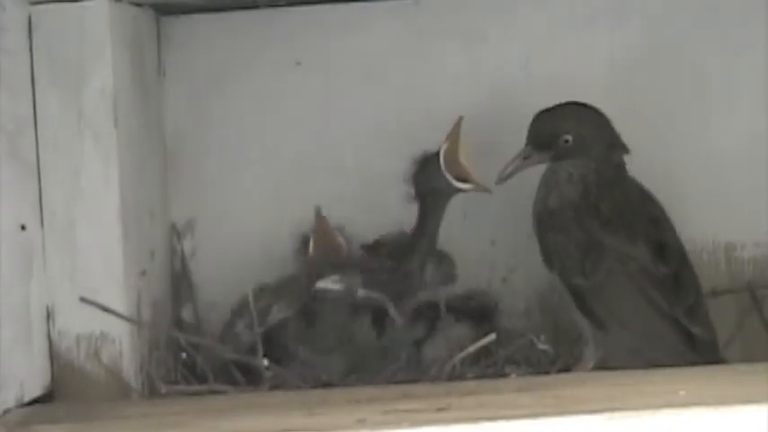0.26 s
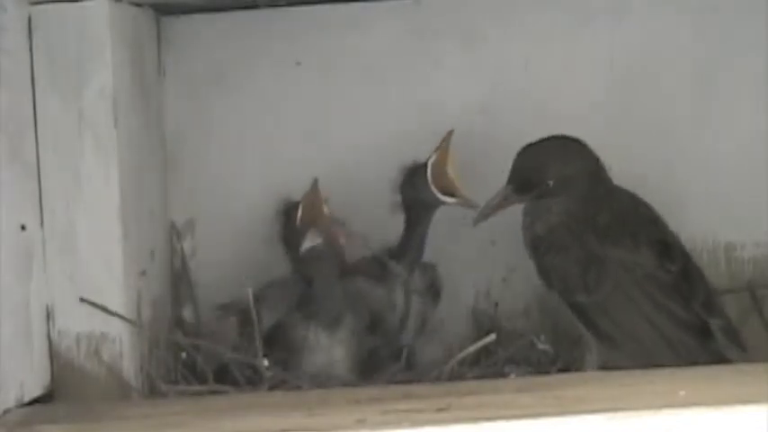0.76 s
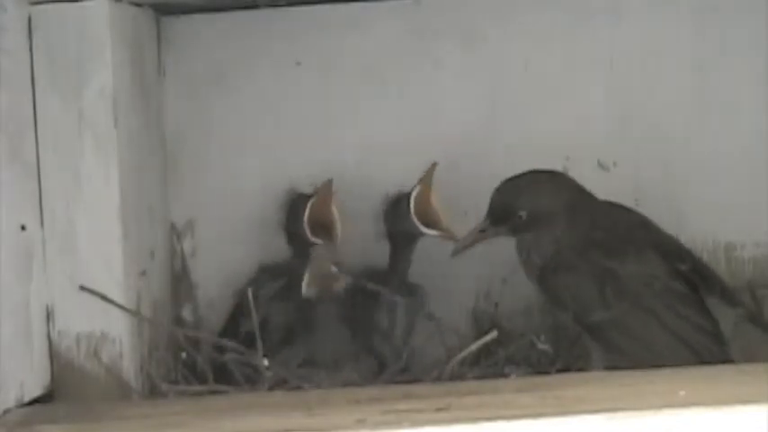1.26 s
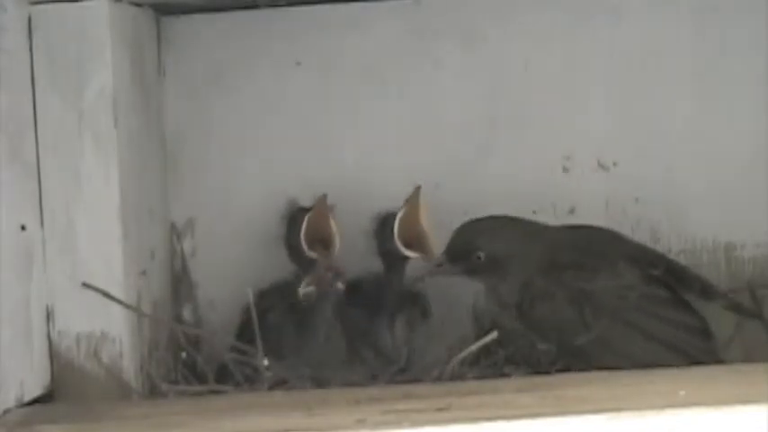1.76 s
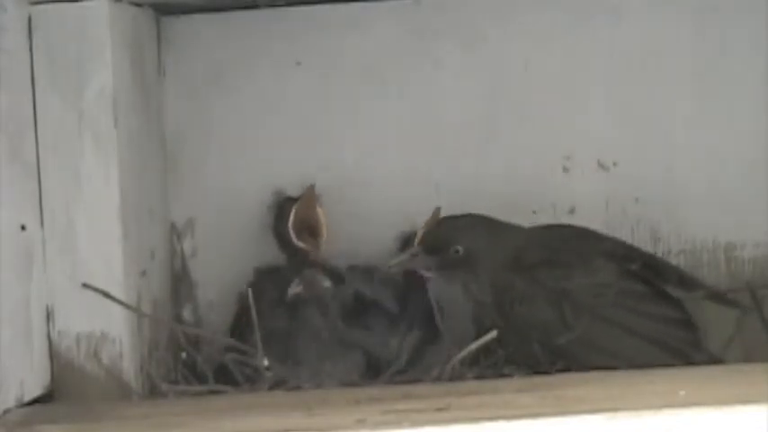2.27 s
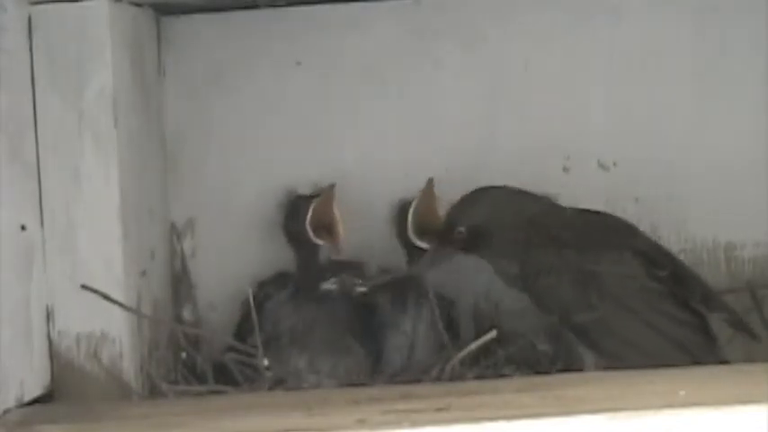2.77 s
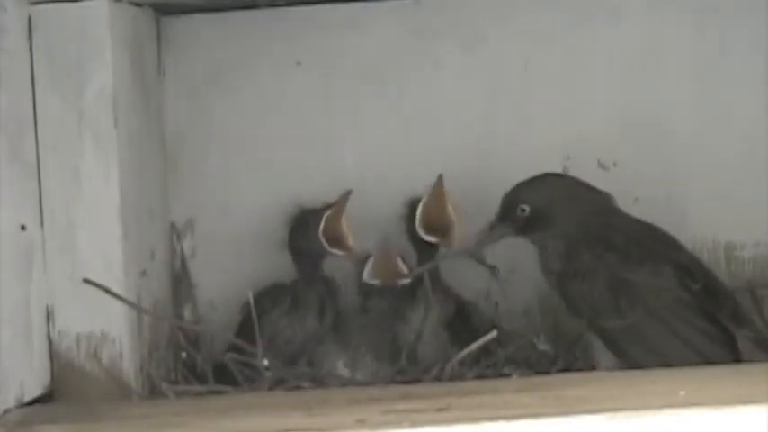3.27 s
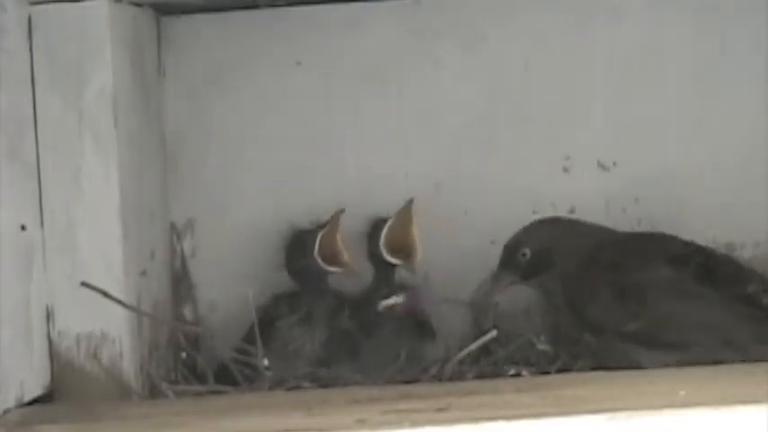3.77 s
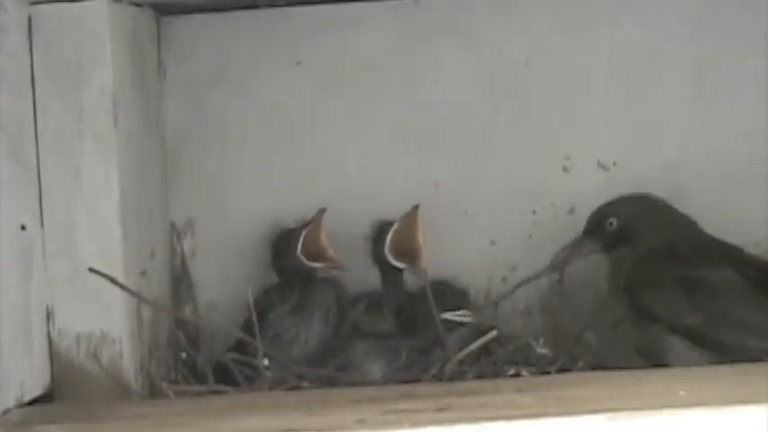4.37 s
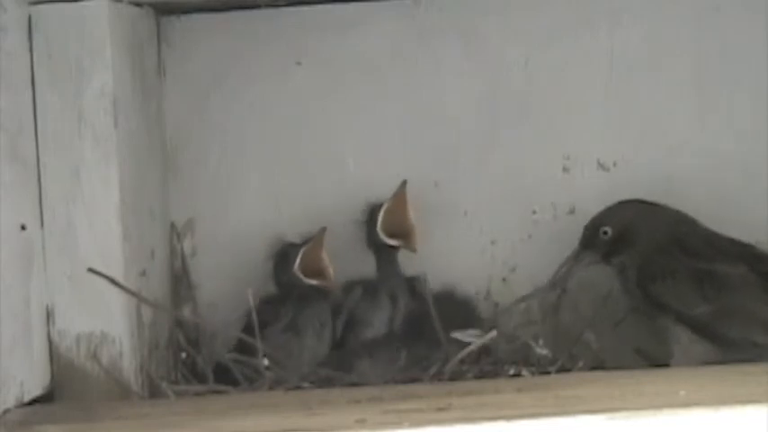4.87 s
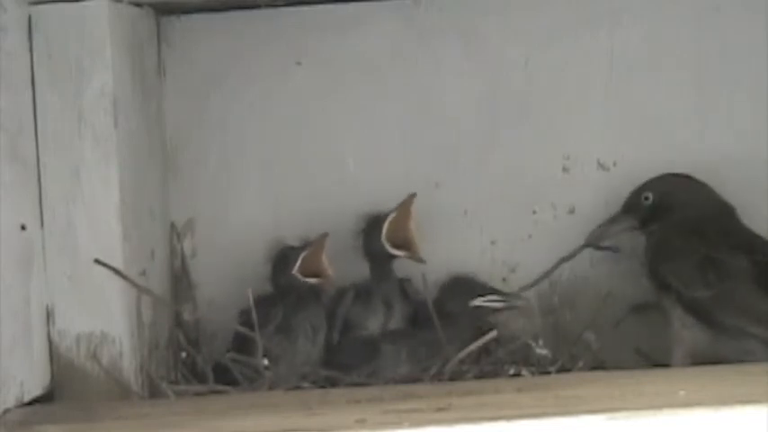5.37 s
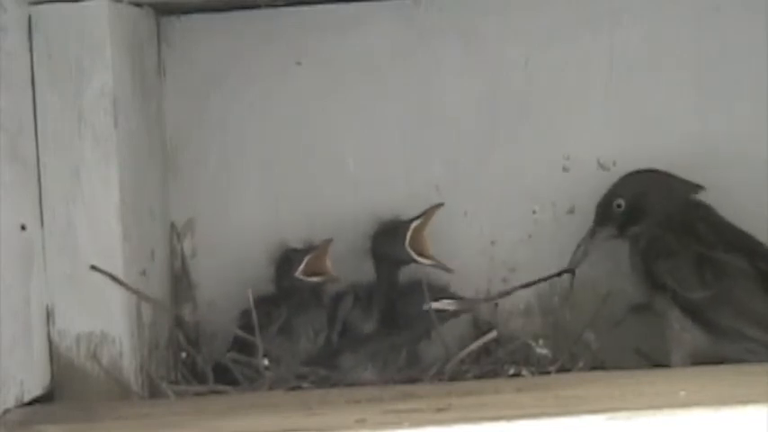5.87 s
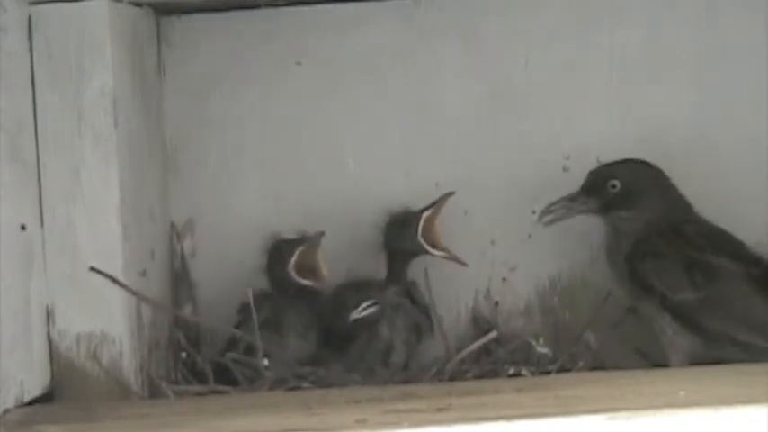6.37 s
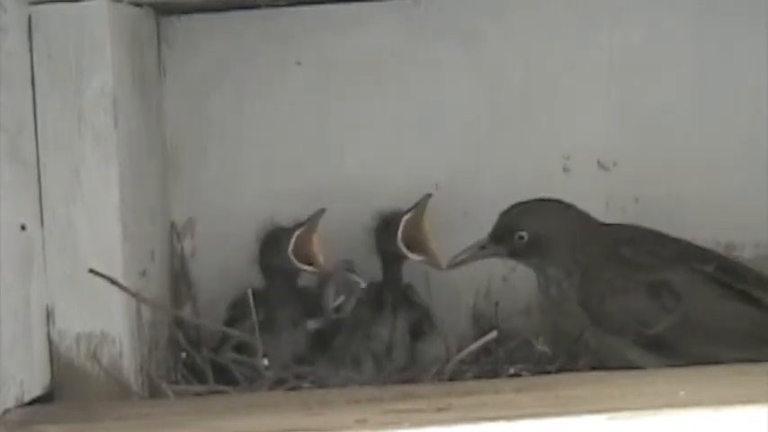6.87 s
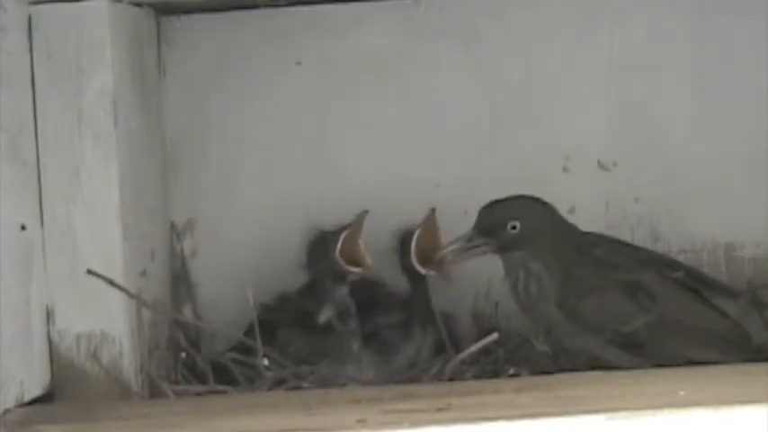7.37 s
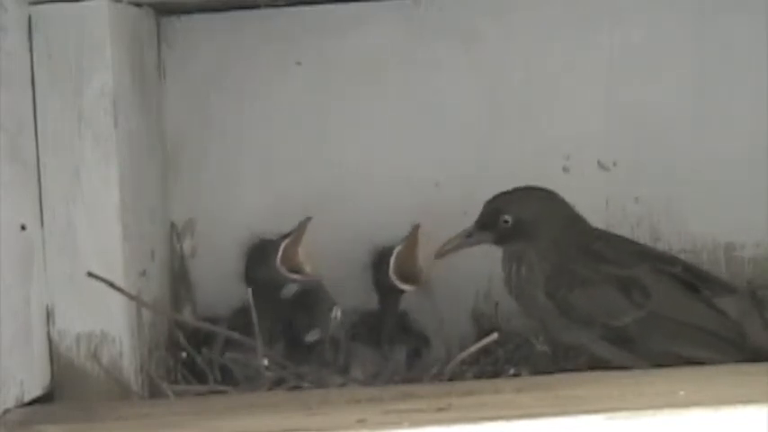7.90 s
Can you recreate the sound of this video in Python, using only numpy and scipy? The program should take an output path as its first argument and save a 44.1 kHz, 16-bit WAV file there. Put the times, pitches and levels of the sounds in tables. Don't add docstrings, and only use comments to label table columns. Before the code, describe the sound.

Several nestling birds beg almost without pause in a small nest box, rapid high trilled peeps overlapping hoarse, squealing rasps, over faint outdoor rumble.

```python
import sys
import numpy as np
from scipy import signal
from scipy.fft import rfft, irfft, next_fast_len
from scipy.io import wavfile
from scipy.ndimage import uniform_filter1d, minimum_filter1d, map_coordinates

SR = 44100
rng = np.random.default_rng(int(sys.argv[2]) if len(sys.argv) > 2 else 0)


def file_out(sig):
    cols = np.atleast_2d(sig).T
    lim = np.clip(cols, -1, 1)
    pcm = np.round(lim * 32767).astype(np.int16)
    wavfile.write(sys.argv[1], SR, pcm)


def gain_from_decibels(decibels):
    exponent = np.asarray(decibels, float) / 20
    return 10 ** exponent


N = 358974


def peeps():
    # start_s, length_s, pitch_hz, level_db
    stray_peeps = [(0.053, .022, 7650, -21.5), (0.107, 0.041, 7645, -22.5), (0.177, 0.015, 6180, -18.5),
                   (.563, 0.037, 7650, -24), (0.854, .038, 7450, -17.5), (1.294, .063, 7770, -25.5),
                   (1.461, .022, 7460, -28.5), (2.177, .02, 5920, -19.5), (2.588, .028, 7610, -20),
                   (3.364, .02, 6225, -24.5), (3.682, .018, 6160, -21), (4.018, 0.022, 5915, -17.5),
                   (4.17, 0.041, 7660, -22), (4.599, .026, 7600, -20.5), (4.633, .016, 6950, -20),
                   (4.657, 0.019, 6110, -17.5), (5.008, .016, 6720, -21), (5.03, 0.019, 6136, -18.5),
                   (5.398, .036, 7380, -23), (5.781, 0.028, 7245, -23.5), (6.077, .016, 7020, -20.5),
                   (6.14, .03, 7815, -24), (6.21, .041, 7780, -19.5), (6.327, .024, 6800, -19.5),
                   (6.392, 0.026, 6940, -23.5), (6.523, .026, 7105, -24), (6.975, 0.011, 6130, -19.5),
                   (7.074, .032, 7135, -21.5), (7.936, .018, 6190, -24), (8.004, .042, 7100, -19)]
    notes = trill_notes()
    notes += [(s, length, hz, -250, db) for s, length, hz, db in stray_peeps]
    track = np.zeros(N + SR)
    for s, length, mid_hz, glide_hz, db in notes:
        size = round((length + 0.016) * SR)
        hook = 800 * np.exp(-np.arange(size) / (0.00323 * SR))
        sag = 100 - 300 * np.linspace(-1, 1, size) ** 2
        hz = mid_hz + glide_hz * np.linspace(-.5, .5, size) + hook + sag
        octave_db = -33.5 - .008 * max(mid_hz - 6700, 0)
        tone = whistle(hz, 80, 3.2, 0.26, 241.3, octave_db=octave_db)
        add(track, s - .001, gain_from_decibels(db + 0.5) * puff(size, 0.35, 1.4) * tone)
    voice = track[:N]
    air = unit(filtered(rng.standard_normal(N), lambda hz: np.exp(-((hz - 10820) / 1100) ** 2)))
    loudness = uniform_filter1d(abs(voice), size=1500)
    return voice + gain_from_decibels(-33.5 + 5 * wobble(25, N)) * air * loudness


def trill_notes():
    # first_note_s, last_note_s, crest_hz, last_note_hz, level_db
    trills = [(0.506, 0.741, 6930, 5945, -19.5), (.923, 1.276, 6933, 6330, -15.5),
              (1.484, 1.84, 7130, 6535, -18.5), (2.078, 2.454, 7233, 6310, -16.5),
              (2.653, 2.938, 7230, 6265, -15.5), (3.143, 3.43, 7520, 6060, -19),
              (3.638, 3.996, 7500, 6335, -17.5), (4.208, 4.493, 7600, 5820, -15.5),
              (4.693, 4.913, 7530, 6665, -16), (5.201, 5.423, 7250, 6525, -15.5),
              (5.703, 5.986, 6910, 6610, -14.5), (6.108, 6.369, 6940, 6760, -19),
              (6.563, 6.85, 7200, 6970, -17.5), (7.067, 7.283, 7440, 6710, -18.5),
              (7.516, 7.814, 7420, 6025, -19), (8.0, 8.074, 7485, 7490, -18.5)]
    # start_s, change_db
    accents = [(.507, 8), (.744, -7), (1.134, 1.5), (1.201, -3), (1.277, -1), (1.766, 4), (1.84, 2),
               (2.794, 3), (3.144, 4), (3.21, 2), (3.279, -4), (3.358, 0), (3.698, -5.5), (4.838, 1.5),
               (4.915, 1), (5.202, 2), (5.761, -4.5), (6.226, 3), (6.294, 5), (6.775, -2), (6.848, 3.5),
               (7.146, -1.5), (7.284, 7), (7.513, -1.5), (8.074, 2.5)]
    pace_s, hurry_s = .073, .009
    accent_s, accent_db = np.transpose(accents)
    rows = []
    for first, last, crest_hz, last_hz, db in trills:
        count = round((last - first) / pace_s)
        second = last - (last - first + hurry_s) * (count - 1) / count
        s = np.append(first, np.linspace(second, last, count))
        droop = (crest_hz - last_hz) * np.linspace(0, 1, count) ** 2.5
        opener_hz = 6514 + .45 * (crest_hz - 7200)
        hz = np.append(opener_hz, crest_hz - droop)
        level = db + (abs(s[:, None] - accent_s) < pace_s / 3) @ accent_db
        usual_s = np.append(.021, np.full(count, 0.0311))
        length = np.clip(usual_s - 0.07 * (level + 16.5), .01, .06)
        glide_hz = min(1.12 * (7500 - crest_hz), 424)
        rows += zip(s, length, hz, np.full(count + 1, glide_hz), level)
    return rows


def squeals():
    # start_s, length_s, pitch_hz, level_db
    arches = [(0.174, .037, 7890, -13), (.236, .046, 8380, -15), (0.286, 0.031, 8175, -21.5),
              (0.334, .04, 8450, -16), (0.414, 0.028, 7600, -11.5), (0.625, .045, 7910, -16.5),
              (0.688, 0.04, 8610, -17), (0.781, .027, 8550, -16.5), (1.515, .021, 8065, -18),
              (1.927, .038, 8230, -21.5), (2.008, 0.044, 8820, -21), (2.1, .042, 8670, -25.5),
              (2.369, 0.02, 8160, -17.5), (2.429, 0.031, 8810, -22), (2.776, .032, 8350, -24.5),
              (2.853, .04, 9000, -26), (2.944, .028, 8690, -19.5), (3.273, 0.052, 8800, -24),
              (3.369, .045, 8420, -20.5), (4.085, .046, 8780, -17.5), (4.182, .016, 8020, -23),
              (5.342, 0.039, 8000, -28), (5.807, .016, 7760, -19.5), (6.583, .056, 8900, -21),
              (6.982, .051, 8700, -18.5), (7.066, 0.058, 8200, -23.5), (7.385, .037, 8720, -17),
              (7.474, .032, 8310, -16), (7.782, .046, 8700, -18), (7.864, .057, 8270, -18)]
    # start_s, level_db
    breaks = [
        (2.441, -21),
        (3.705, -22),
        (4.099, -24),
        (4.503, -23.5),
        (5.727, -33),
        (6.139, -24.5),
        (7.398, -25),
        (7.789, -36),
    ]
    track = np.zeros(N + SR)
    rasp_s, _, air_db = np.transpose(rasp_rows())
    notes = [(s, length, hz, 351, db) for s, length, hz, db in arches]
    notes += [(s, .03, 9590, -120, db) for s, db in breaks]
    for s, length, hz, climb_hz, db in notes:
        strain_db = np.clip(np.interp(s, rasp_s, air_db) - db + 3, -14, 3)
        squeal = arch(hz - climb_hz / 2, hz + climb_hz / 2, length + 0.02, 0.1, strain_db)
        add(track, s - .01, gain_from_decibels(db - 2.0) * squeal)
    return track[:N]


def rasps():
    # share_of_rasp, pitch_hz
    rasp_rise = [(0, 6095), (0.33, 5591), (0.62, 6147), (1, 7580)]
    # frequency_hz, level_db
    breath = [(4000, -19.5), (5200, -10), (6300, 0.5), (9000, -12.5), (11500, -8), (13000, -25.5),
              (15500, -41.5)]
    track, effort = np.zeros(N + SR), np.zeros(N + SR)
    size, short = round(.045 * SR), round(0.029 * SR)
    share, rise_hz = np.transpose(rasp_rise)
    hz = np.interp(np.linspace(0, 1, size), share, rise_hz)
    for s, db, air_db in rasp_rows():
        rasp = whistle(hz, 200, 4.5, .45, 350, octave_db=-27)
        add(track, s - .012, gain_from_decibels(db - 5) * puff(size, .5, 1) * rasp)
        grunt = whistle(hz[:short] / 2, 59, 7.6, 0.54, 205)
        grunt = grunt + gain_from_decibels(-5.5) * whistle(hz[:short] * .77, 150, 1.9, 0.24, 300)
        add(track, s - .006, gain_from_decibels(-42.0 + 0.1 * (db + 15.0)) * puff(short, 0.55, 3.7) * grunt)
        add(track, s - .06, gain_from_decibels(air_db - 4) * arch(*rng.normal((7900, 8400), 150), .058, hoarse=.1))
        add(track, s + .02, gain_from_decibels(air_db - 2) * arch(*rng.normal((8400, 8600), 150), .065, hoarse=.1))
        add(effort, s - .065, gain_from_decibels(air_db - 13.5) * puff(round(.15 * SR), .45, 1.3))
    hiss = unit(filtered(rng.standard_normal(N), lambda hz: gain_from_decibels(along(breath, hz))))
    return track[:N] + effort[:N] * hiss * gain_from_decibels(4 * wobble(60, N))


def rasp_rows():
    # first_s, last_s, first_db, last_db, last_air_db
    bouts = [(.0044, .0817, -14, -19, -51.5), (.216, .3885, -14, -16.5, -51), (0.445, .4454, -19, -21, -63),
             (0.6616, .833, -16.5, -15, -61), (1.104, 1.277, -21.5, -22, -48),
             (1.5597, 1.737, -14.5, -19, -57), (1.9786, 2.0647, -13.5, -12.5, -21.5),
             (2.404, 2.4954, -20, -18.5, -24), (2.8382, 3.0061, -19.5, -17.5, -50),
             (3.262, 3.3518, -13.5, -19, -31.5), (3.669, 3.7626, -17, -15.5, -28.5),
             (4.065, 4.153, -15, -18, -26.5), (4.4756, 4.567, -15.5, -17, -25.5),
             (4.9095, 5.002, -21.5, -13, -61), (5.2949, 5.3869, -19, -22, -53),
             (5.6952, 5.7862, -24.5, -17.5, -49), (6.111, 6.2913, -27, -17, -63),
             (6.5615, 6.6583, -16, -16.5, -33), (6.9665, 7.0564, -15, -14.5, -31),
             (7.361, 7.453, -16.5, -16, -39), (7.7617, 7.8511, -15.5, -15, -26.5),
             (8.17, 8.17, -16, -16, -19.5)]
    # time_s, air_db
    strain = [(0, -27), (.216, -38), (.7, -26), (1.12, -28.5), (1.56, -21.5), (2.45, -25), (3.26, -25.5),
              (3.67, -20.5), (4.5, -24), (4.9, -25.5), (5.7, -23), (6.15, -32.5), (6.56, -25), (7, -20),
              (8, -21.5)]
    rows = []
    for first, last, first_db, last_db, last_air_db in bouts:
        count = round((last - first) / .088) + 1
        s = np.linspace(first, last, count)
        air_db = np.append(np.interp(s[:-1], *np.transpose(strain)), last_air_db)
        rows += zip(s, np.linspace(first_db, last_db, count), air_db)
    return rows


def arch(start_hz, end_hz, length, hoarse, strain_db=0):
    spacing_hz, pairs_db = 921, [-13, -21.5, -26.5]
    size = round(length * SR)
    u = np.linspace(-1, 1, size)
    hz = np.linspace(start_hz, end_hz, size) + 250 - 250 * u ** 2 - 1300 * u ** 4 - 300 * u ** 3
    beat = 2 * np.pi * np.cumsum(spacing_hz + 90 * wobble(150, size)) / SR
    pairs = 0
    for k, db in enumerate(pairs_db, start=1):
        level = gain_from_decibels(db + strain_db + 6.75 * wobble(90, size))
        pairs = pairs + 2 * level * np.cos(k * beat + k * k)
    return puff(size, .5, .75) * whistle(hz, 60, 3, hoarse, 300) * (1 + pairs)


def whistle(hz, waver_hz, flutter_db, hoarse, rate, octave_db=-60):
    size = len(hz)
    phase = 2 * np.pi * (np.cumsum(hz + waver_hz * wobble(rate, size)) / SR + rng.random())
    smear = wobble(1481, size) * np.sin(phase) + wobble(1508, size) * np.cos(phase)
    tone = np.sin(phase) + hoarse * smear + gain_from_decibels(octave_db) * np.sin(2 * phase)
    return unit(gain_from_decibels(flutter_db * wobble(rate, size)) * tone)


def puff(size, peak_at, sharp):
    u = np.linspace(0, 1, size) ** (np.log(.5) / np.log(np.clip(peak_at, .1, .9)))
    return unit(np.sin(np.pi * u) ** sharp)


def box(x, early_t60, late_t60, late_db):
    t = np.arange(SR // 3) / SR
    decay = gain_from_decibels(-60 * t / early_t60) + gain_from_decibels(late_db - 60 * t / late_t60)
    tail = rng.standard_normal((2, len(t))) * decay * (t > .002)
    return signal.fftconvolve(x[None], tail / np.linalg.norm(tail[0]), axes=1)[:, :N]


def ports(hz):
    # frequency_hz, level_db
    left_over_right = [(7500, 1), (8300, 0), (8900, -20.5), (9600, -5.5), (10800, 0), (13500, 6.5),
                       (14700, -19.5)]
    # frequency_hz, phase_radians
    left_lead = [(6700, 0), (7400, -.45), (8400, -2.2), (9050, .3), (9650, .8), (10900, 1.2), (12000, 3)]
    left = gain_from_decibels(along(left_over_right, hz))
    lead = np.exp(.5j * along(left_lead, hz) * np.clip((hz - 5500) / 1200, 0, 1))
    return np.array([left * lead, 1 / lead]) * np.sqrt(2 / (1 + left ** 2))


def outdoors():
    # time_s, level_db
    rumble = [(0, -40), (.9, -39.5), (1.2, -44), (1.55, -39.5), (4.4, -40), (5.3, -45.5), (6.3, -42),
              (6.9, -38.5), (8.14, -38.5)]
    # frequency_hz, level_db_per_hz
    colour = [(25, -16), (45, -5), (200, 1.5), (470, -1), (580, -9.5), (800, 0), (1000, -6.5), (1500, -5.5),
              (2400, -11), (5200, -20.5), (8500, -23.5), (17000, -120)]
    # frequency_hz, left_right_likeness
    alike = [(30, -1.12), (130, 0.19), (290, 1), (640, 0.51), (1400, 0.99), (2500, 0.97)]
    z = signal.stft(rng.standard_normal((2, N)), nperseg=512)[2]
    patches = uniform_filter1d(rng.standard_normal(z.shape[1:]), 8, axis=0)
    patches = uniform_filter1d(patches, 10, axis=1)
    pair = signal.istft(z * gain_from_decibels(1.64 * unit(patches)), nperseg=512)[1][:, :N]

    def spread(hz):
        turn = np.arccos(np.clip(along(alike, hz), -1, 1)) / 2
        return gain_from_decibels(along(colour, hz)) * [np.cos(turn), np.sin(turn)]

    mid, side = filtered(pair, spread)
    s, db = np.transpose(rumble)
    level = gain_from_decibels(np.interp(np.arange(N) / SR, s, db) + 2.0 + 0.37 * wobble(5, N))
    return level * unit(np.array([mid + side, mid - side]))


def thinned(x, treble_db, middle_db):
    hz, _, z = signal.stft(x, SR, nperseg=1024)
    edges = np.geomspace(3000, 16000, num=22)
    band = np.digitize(hz, edges)
    power = np.array([(abs(z[:, band == b]) ** 2).mean(axis=(0, 1)) for b in range(band.max() + 1)])
    luck = gain_from_decibels(4.5 * rng.standard_normal(power.shape))
    under = gain_from_decibels(2 * np.where(hz > 8300, treble_db, middle_db))[:, None]
    heard = (power * luck)[band] > power.max(axis=0) * under
    keep = heard | (hz < 3000)[:, None]
    return signal.istft(z * keep, SR, nperseg=1024)[1][:, :N]


def unit(x):
    return x / np.sqrt(np.mean(x ** 2) + 1e-20)


def along(points, hz):
    f, v = np.transpose(points)
    return np.interp(np.log(hz + 1), np.log(f + 1), v)


def wobble(rate, size):
    knots = rng.standard_normal(int(size * min(2 * rate, 2000) / SR) + 8)
    curve = map_coordinates(knots, [np.arange(size) * rate / SR], prefilter=False)
    return np.clip(np.sqrt(2) * curve, -2, 2)


def filtered(x, response):
    m = next_fast_len(N + SR // 2)
    return irfft(rfft(x, m) * response(np.fft.rfftfreq(m, 1 / SR)), m)[..., :N]


def add(track, s, sound):
    at = round(s * SR)
    track[max(at, 0):][:len(sound) + min(at, 0)] += sound[max(-at, 0):]


def scene():
    chicks = peeps() + squeals() + rasps()
    tail = box(chicks, early_t60=0.035, late_t60=0.2, late_db=-3)
    tail = filtered(tail, lambda hz: 1 / (1 + (hz / 14000) ** 4))
    apart = filtered(tail[1], lambda hz: np.clip((hz - 4500) / 3000, 0, 1))
    wet = gain_from_decibels(-5.5) * (tail[0] + gain_from_decibels(-1.5) * apart * np.array([[1], [-1]]))
    return filtered(chicks + wet, ports) + outdoors()


def top_cut(x):
    return signal.sosfilt(signal.butter(12, 15570, fs=SR, output="sos"), x)


def record(dry):
    buzz_hz = 299.06
    thin = thinned(dry, treble_db=-40, middle_db=-47.5)

    def hum_filter(hz):
        turn = np.exp(-2j * np.pi * hz / buzz_hz)
        return 0.79 * (1 - 0.94 * turn) / (1 - 0.63 * turn)

    clean = filtered(thin, hum_filter)
    needed = np.minimum(1, .78 / (abs(clean).max(axis=0) + 1e-9))
    gain = uniform_filter1d(minimum_filter1d(needed, size=265), size=133)
    return top_cut(clean * gain)


dry = scene()
out = record(dry)
file_out(out)
```